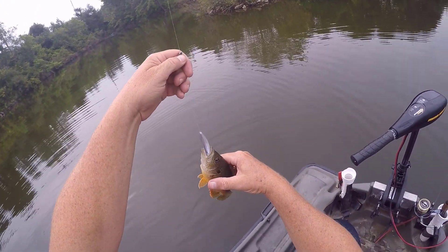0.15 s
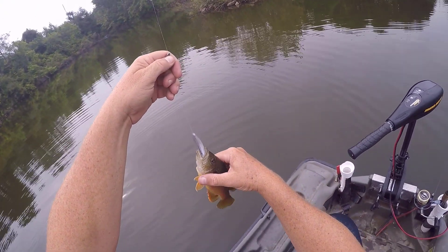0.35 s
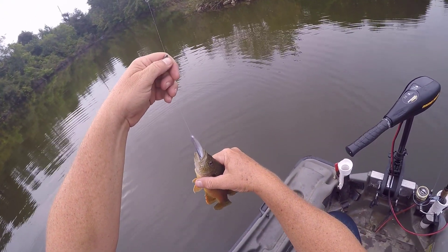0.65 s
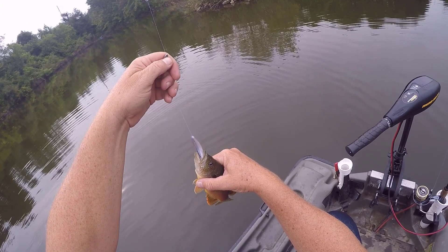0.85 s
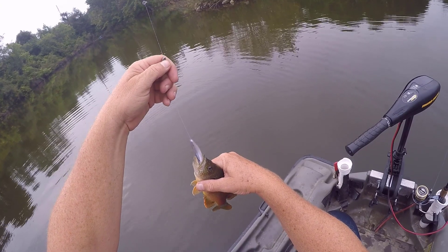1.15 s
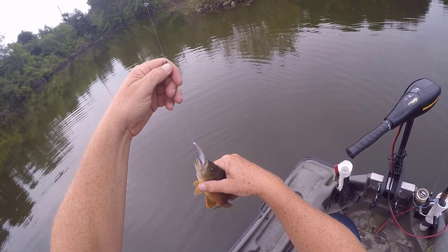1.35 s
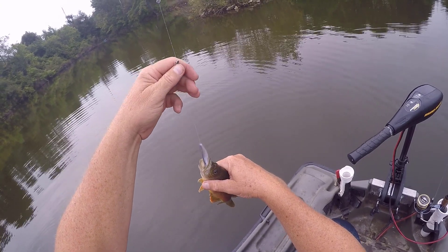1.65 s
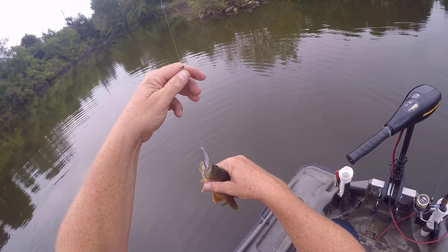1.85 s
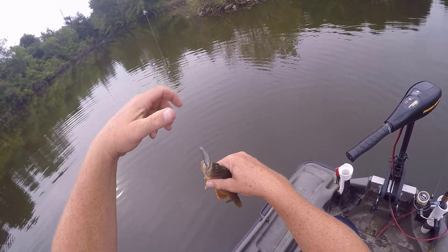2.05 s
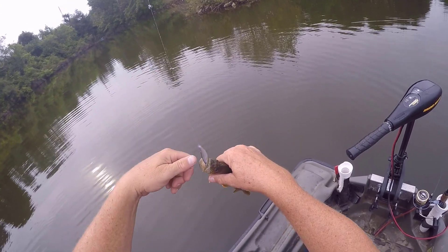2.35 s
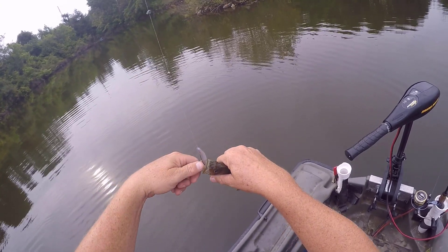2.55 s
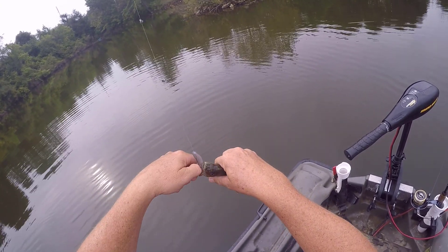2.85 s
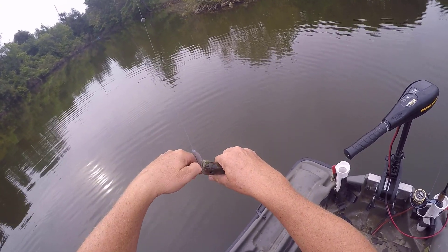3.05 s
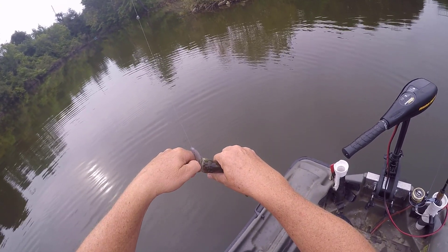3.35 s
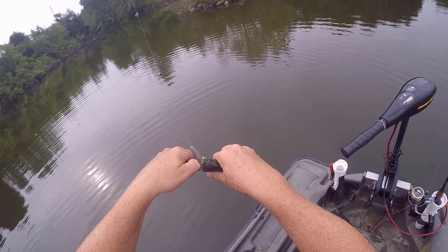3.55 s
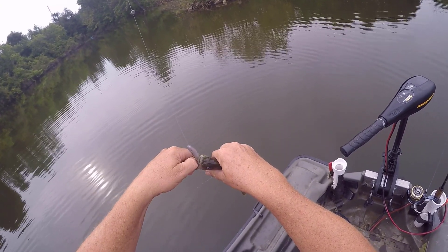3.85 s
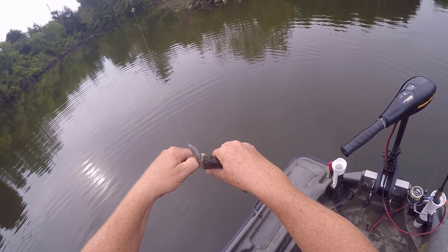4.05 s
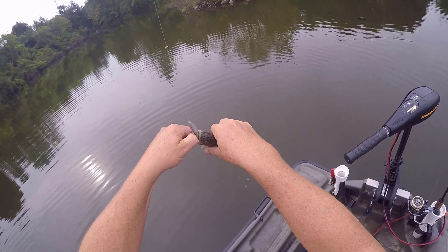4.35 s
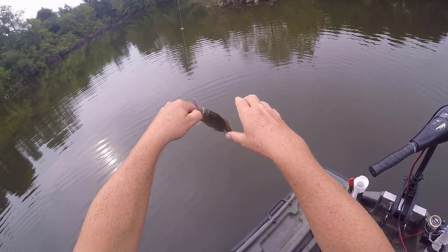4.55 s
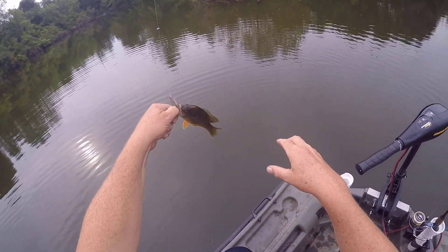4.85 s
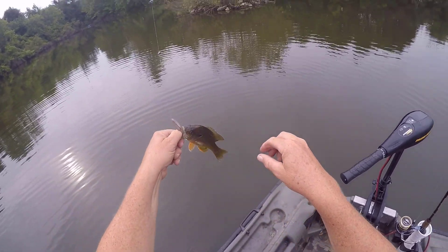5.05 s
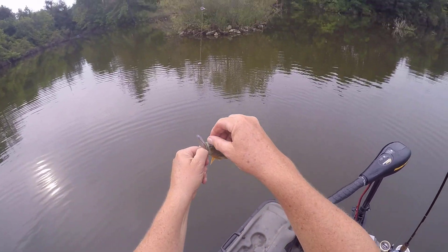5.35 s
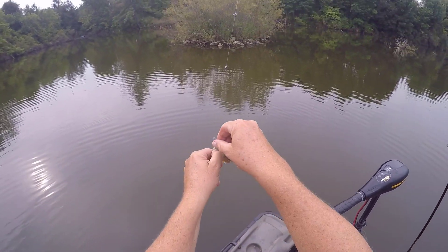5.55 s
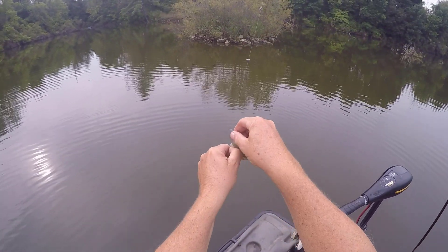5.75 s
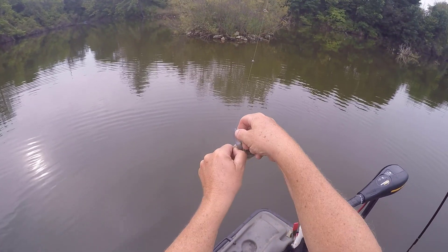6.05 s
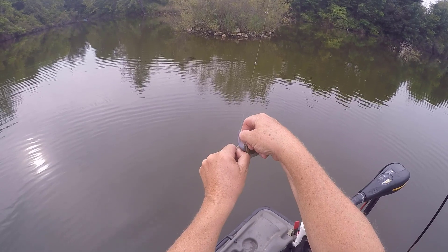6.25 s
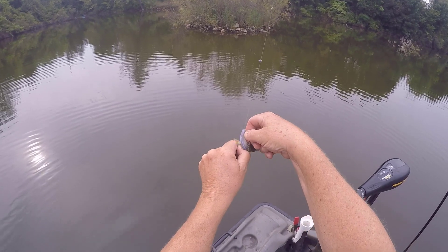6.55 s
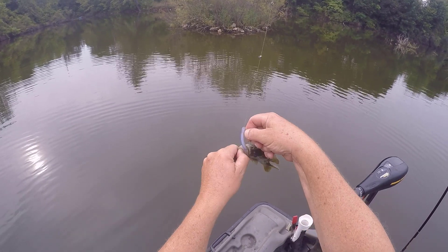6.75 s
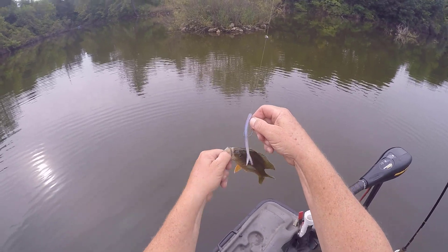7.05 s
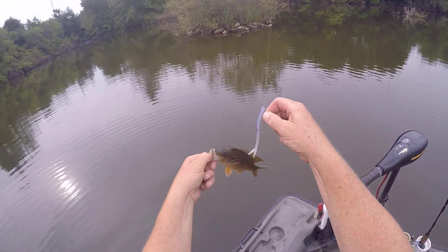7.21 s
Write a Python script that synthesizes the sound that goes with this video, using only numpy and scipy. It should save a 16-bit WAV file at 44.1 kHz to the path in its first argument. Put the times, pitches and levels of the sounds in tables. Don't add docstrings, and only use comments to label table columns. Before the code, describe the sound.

A dense, high cicada chorus, slightly stronger on the right, runs unbroken over a deep rumble of far engines, with soft hiss, faint hum and a thin camera whine. Small ticks open at 0.05 s; thin bird chips sweep up and down around 0.4 and 1.2 s, and a soft rub follows near 0.9 s. Faint taps come at 1.4 and 1.65 s. From 2.2 to 3.2 s a bird whistles a short phrase stepping high to low, twice, echoing lightly off the banks, with dull touches near 2.4 and 2.9 s. Between 4.3 and 5.1 s, wet rubbing and knocks mix with chips and faint slurred whistles. A nearer cicada buzzes very faintly from 5.2 to 7.4 s, in two bouts. More touches come at 5.5 and 5.75 s, then ticks lead to a sharp double snap at 6.43 s. A soft tap, faint distant whistles and tiny ticks finish by 7.4 s.

```python
import sys
import numpy as np
from scipy import signal
from scipy.fft import rfft, irfft, next_fast_len
from scipy.io import wavfile

SR = 44100
rng = np.random.default_rng(int(sys.argv[2]) if len(sys.argv) > 2 else 0)


def boost(x):
    u = np.asarray(x, float) / 20
    return 10 ** u


def pcm_store(signal):
    levels = np.round(np.clip(np.atleast_2d(signal), -1, 1) * 32767)
    wavfile.write(sys.argv[1], SR, levels.astype(np.int16).T)


N = 325458

# t/s, level/dB, left-right difference/dB
CHORUS_SWELL = [
    (0.0, -42, -2.5),
    (4.4, -42.5, -3),
    (5.8, -42, -2),
    (7.38, -42.5, -1.2),
]
# f/Hz, density/(dB per Hz)
TYMBAL_SPECTRUM = [(2470, -25), (4200, -23), (4490, -25), (5270, -2.5), (5820, -6), (6450, 5.5), (6760, 1),
                   (7670, -35), (8790, -27), (9300, -31), (12100, -62), (20500, -120)]
# t/s, duration/s, level/dB
SOLO_BOUTS = [
    (5.2, 1.18, -63),
    (6.47, .95, -64.5),
]
SOLO_EDGE_S = .08
# f/Hz, likeness/(0-1)
LIKENESS = [(30, 0.98), (150, 0.99), (300, 0.83), (600, 0.66), (2500, 0.56), (5000, 0.52), (12000, 0.16)]

# t/s, duration/s, start f/Hz, end f/Hz, level/dB
PHRASE = [(2.175, .13, 3685, 3710, -46.5), (2.29, 0.043, 3120, 2920, -54), (2.3, 0.1, 3660, 3680, -64),
          (2.35, 0.034, 2300, 2340, -60), (2.41, 0.046, 2330, 2315, -49), (2.46, 0.071, 2320, 2276, -57),
          (2.71, .125, 3770, 3600, -48.5), (2.85, .035, 3040, 3060, -57), (2.855, 0.056, 3660, 3730, -52.5),
          (2.9, .03, 2370, 2320, -52), (2.945, 0.067, 2334, 2320, -54), (2.995, 0.08, 2290, 2280, -64),
          (3.13, 0.066, 2310, 2320, -64)]
# t/s, duration/s, start f/Hz, end f/Hz, level/dB
SLURS = [(.085, .08, 3030, 3020, -65), (.69, .095, 745, 733, -60), (1.525, .05, 3050, 3060, -61),
         (1.56, .165, 3040, 3010, -55), (1.71, .21, 2880, 2560, -66), (1.93, .13, 3010, 2700, -66),
         (4.98, .075, 3020, 2980, -59), (5.04, .12, 3070, 2960, -57), (5.14, .08, 2960, 2720, -59),
         (5.74, .27, 2900, 2980, -61), (6.055, .055, 2830, 2680, -60), (6.98, .06, 2990, 3000, -54),
         (7.025, .08, 3050, 3070, -56), (7.09, .11, 3090, 3110, -67), (7.21, .16, 3430, 3440, -64)]
ATTACK_S, RELEASE_S, SAG_DB = .012, .022, 5
# t/s, level/dB, duration/s
FALLING_CHIPS = [(.405, -50, .036), (1.315, -51, .025), (2.172, -46.5, .034), (3.188, -50, 0.05),
                 (4.36, -52, .022), (5.092, -44, 0.047)]
RISING_CHIPS = [(.382, -38, 0.016), (1.177, -45, 0.029), (4.78, -43, .015), (4.897, -38, 0.021)]
FALL_MID_HZ, FALL_HZ_PER_S = 7980, -20000
RISE_MID_HZ, RISE_HZ_PER_S = 7010, 30000
CHIP_LEAN_DB = 4
ECHO_T60_S, WHISTLE_ECHO_DB, CHIP_ECHO_DB, HAND_ECHO_DB = .35, -10, -9, -20

# t/s, peak level/dB, ring f/Hz, ring T60/s, crack level/dB
TOUCHES = [(1.366, -48, 641, 0.017, -6), (1.653, -46, 797, 0.018, 8), (2.359, -39.5, 416, 0.018, 0),
           (2.398, -40, 400, 0.061, 1), (2.867, -38, 1160, 0.025, -10), (4.385, -42.5, 495, 0.025, 11),
           (4.427, -39, 930, 0.023, -1), (4.586, -40.5, 2060, 0.011, 0), (4.732, -43, 618, 0.12, 1),
           (5.499, -42, 1090, 0.025, -8), (5.754, -42.5, 855, 0.029, 0), (6.848, -42, 668, 0.034, -13)]
# t/s, peak level/dB, ring f/Hz
TICKS = [(.0372, -34, 2400), (.062, -41, 1300), (5.826, -46, 2000), (6.1135, -39, 4100),
         (6.3928, -38, 3300), (6.4045, -38, 3100), (6.41, -37, 3200), (7.2145, -45, 3430),
         (7.2564, -43, 3420)]
TICK_CYCLES, TICK_CRACK_DB, CRACK_T60_S = 22.0, -3, .005
# t/s, peak level/dB, ring f/Hz, ring T60/s, crack level/dB
SNAP = [
    (6.4192, -29, 1990, .018, 3),
    (6.4194, -31, 6500, .003, 3),
    (6.4391, -25, 3350, .005, 0),
    (6.4392, -32, 11800, .005, 2),
    (6.4396, -30, 1850, .008, 0),
    (6.4398, -32, 750, .012, -6),
]
# t/s, duration/s, level/dB
RUBS = [(0.023, 0.039, -69), (0.9, 0.38, -58.5), (2.345, .09, -55), (4.288, 0.23, -53), (4.477, 0.11, -59),
        (4.67, 0.18, -55.5), (5.005, 0.053, -50), (5.493, .12, -55.5), (5.75, 0.076, -53)]
# f/Hz, density/(dB per Hz)
RUB_SPECTRUM = [(150, -12), (250, 8), (377, -1), (612, 0), (761, -2), (946, -2), (4500, -23), (5850, -50),
                (9900, -120)]
RUB_EDGE_S = .03

FRAME_HZ, WHINE_HZ = 59.94, 4784
# multiple of frame rate, level/dB rms
HUM = [(4, -62.5), (6, -67), (10, -80), (12, -74.5), (14, -73),
       (163, -85), (171, -84), (179, -88), (180, -84), (195, -87), (228, -80), (244, -83)]
# multiple of the whine pitch, bandwidth/Hz, level/dB rms
WHINE_BANDS = [(1, 98, -66.5), (2, 76, -70.5), (3, 200, -67.5)]

# t/s, level/dB
RUMBLE_SWELL = [(0.0, -30), (0.35, -32.5), (2.6, -33), (3.3, -32), (4.0, -33), (5.9, -31.5), (7.38, -33)]
# f/Hz, density/(dB per Hz)
RUMBLE_SPECTRUM = [(7.1, -45), (12, -7.5), (43, 2), (65, -1), (117, -7), (151, -12), (173, -16.5),
                   (228, -24), (270, -25.5), (354, -29.5), (498, -36.5), (700, -35), (910, -45.5),
                   (1540, -120)]
# f/Hz, bandwidth/Hz, level/dB rms
ENGINE_HUMPS = [(56.5, 8.6, -42.5), (86.6, 3.4, -53), (108.24, 4.7, -49), (145.96, 3.7, -53),
                (214.1, 8.6, -58)]
# f/Hz, density/(dB per Hz)
AIR_SPECTRUM = [(240, -52), (400, -58), (550, -28), (827, -13), (1240, -13.5), (1470, -14.5), (3820, -18),
                (4510, -16.5), (5240, -7.5), (6480, 3), (8770, -18), (14900, -19.5)]
AIR_DB = -44
LEAN_DB = -1.6
TOP_HZ = 15170


def cicadas(near_db, count=40):
    crowd = rng.standard_normal((2, N))
    for k, rate in enumerate(rng.uniform(95, 200, count)):
        polarity = (-1) ** (k // 2)
        insect_gain = boost(near_db + rng.normal(0, 4.1))
        crowd[k % 2] += insect_gain * polarity * click_train(rate, jitter=.08)
    level_db, lean_db = in_time(CHORUS_SWELL)
    return colour(crowd, TYMBAL_SPECTRUM) * pan(boost(level_db), lean_db)


def click_train(per_s, jitter):
    intervals = SR / per_s * (1 + jitter * rng.standard_normal(3000))
    at = np.cumsum(intervals)
    clicks = np.full(N, 1e-18)
    clicks[at[(at > 0) & (at < N)].astype(int)] = 1
    return clicks


def soloist():
    phase = np.pi * 81 * np.arange(N) / SR
    strokes = np.sin(phase) ** 4 * (1 + 0.43 * np.sin(phase))
    buzz = strokes * rng.standard_normal(N)
    tone = resonance(buzz, 8000, width_hz=90) + 0.33 * resonance(buzz, 7600, width_hz=160)
    level = sum(boost(db) * bout(s, length, SOLO_EDGE_S, SOLO_EDGE_S) for s, length, db in SOLO_BOUTS)
    return level * rms_one(tone)


def whistles(notes, waver, flutter_db):
    song = np.zeros(N)
    bend = 1 + waver * flutter(55)
    for s, length, start_hz, end_hz, db in notes:
        at = slice(int(s * SR), int((s + length) * SR))
        way = np.linspace(0, 1, at.stop - at.start)
        hz = (start_hz + (end_hz - start_hz) * way) * bend[at]
        tone = np.sin(2 * np.pi * np.cumsum(hz) / SR)
        envelope = boost(db - SAG_DB * way) * bout(s, length, ATTACK_S, RELEASE_S)[at]
        song[at] += np.sqrt(2) * envelope * tone
    return song * boost(flutter_db * flutter(50))


def chips(rows, mid_hz, hz_per_s):
    out = np.zeros(N)
    for s, db, length in rows:
        way = np.linspace(0, 1, int(length * SR))
        hz = mid_hz + hz_per_s * length * (way - .5)
        tone = np.sin(2 * np.pi * np.cumsum(hz) / SR)
        out[int(s * SR):][:len(way)] += np.sqrt(2) * boost(db) * np.sin(np.pi * way) * tone
    return pan(out, CHIP_LEAN_DB)


def banks(x, echo_db):
    t = np.arange(int(.3 * SR)) / SR
    cloud = rng.standard_normal((2, len(t))) * boost(-60 * t / ECHO_T60_S) * (t > .008)
    cloud *= boost(echo_db) / np.sqrt(np.sum(cloud ** 2, axis=1, keepdims=True))
    return x + signal.fftconvolve(x * np.ones((2, 1)), cloud, axes=1)[:, :N]


def handling():
    out = np.zeros(N)
    t = np.arange(int(.06 * SR)) / SR
    ticks = [(s, db, hz, TICK_CYCLES / hz, TICK_CRACK_DB) for s, db, hz in TICKS]
    for s, db, hz, t60, crack_db in TOUCHES + ticks + SNAP:
        ring = np.sin(2 * np.pi * hz * t) * boost(-60 * t / max(t60, .002))
        crack = rng.standard_normal(len(t)) * boost(crack_db - 60 * t / CRACK_T60_S)
        band = signal.butter(2, [300, min(3.8 * hz, 15500)], "band", fs=SR, output="sos")
        crack = signal.sosfilt(band, crack)
        out[int((s + .0005) * SR):][:len(t)] += boost(db) * (ring + crack * np.sqrt(4000 / hz))
    return out


def rubbing():
    grains = rng.standard_normal((2, N)) * boost(2.3 * flutter(55))
    level = sum(boost(db) * bout(s, length, RUB_EDGE_S, RUB_EDGE_S) for s, length, db in RUBS)
    return level * colour(grains, RUB_SPECTRUM)


def camera():
    turn = 2 * np.pi * FRAME_HZ * np.arange(N) / SR
    out = sum(np.sqrt(2) * boost(db) * np.sin(k * turn + rng.uniform(0, 7.37)) for k, db in HUM)
    gate = 1 + 0.1 * np.cos(turn) + 0.43 * np.cos(3 * turn)
    for k, width_hz, db in WHINE_BANDS:
        out = out + boost(db) * gate * narrow_noise(k * WHINE_HZ, width_hz)
    return out


def rumble():
    swell = boost(in_time(RUMBLE_SWELL)[0] - 2.0)
    return swell * colour(rng.standard_normal((2, N)), RUMBLE_SPECTRUM) + engines()


def engines():
    return sum(boost(db) * narrow_noise(hz, width_hz) for hz, width_hz, db in ENGINE_HUMPS)


def air():
    return boost(AIR_DB) * colour(rng.standard_normal((2, N)), AIR_SPECTRUM)


def narrow_noise(hz, width_hz):
    once = resonance(rng.standard_normal(N), hz, width_hz)
    return rms_one(resonance(once, hz, width_hz))


def resonance(x, hz, width_hz):
    r = np.exp(-np.pi * width_hz / SR)
    zeros = np.array([1, 0, -1]) * (1 - r * r) / 2
    poles = [1, -2 * r * np.cos(2 * np.pi * hz / SR), r * r]
    return signal.lfilter(zeros, poles, x)


def colour(pair, spectrum):
    size = next_fast_len(N)
    hz = np.arange(1, size // 2 + 2) * SR / size
    mid, side = rfft(pair, size)
    alike = np.clip(at_hz(LIKENESS, hz), 0, 1)
    both = np.sqrt(1 + alike) * mid + np.sqrt(1 - alike) * side * [[1], [-1]]
    return rms_one(irfft(both * boost(at_hz(spectrum, hz)), size)[:, :N])


def at_hz(points, hz):
    table_hz, values = np.array(points).T
    return np.interp(np.log(hz), np.log(table_hz), values)


def in_time(rows):
    s, *columns = np.transpose(rows)
    return [np.interp(np.arange(N) / SR, s, c) for c in columns]


def flutter(per_s):
    steps = rng.standard_normal(int(N / SR * 60) + 2)
    return np.interp(np.arange(N) / SR * min(per_s, 59), np.arange(len(steps)), steps)


def bout(s, length, rise_s, fall_s):
    t = np.arange(N) / SR - s
    return np.clip(np.minimum(t / rise_s, (length - t) / fall_s), 0, 1)


def pan(x, lean_db):
    return np.array([x * boost(lean_db / 2), x * boost(-lean_db / 2)])


def rms_one(x):
    return x / np.sqrt(np.mean(x ** 2) + 1e-20)


def scene():
    song = whistles(PHRASE, waver=.004, flutter_db=1.5) + whistles(SLURS, waver=.009, flutter_db=3.0)
    thin = chips(FALLING_CHIPS, FALL_MID_HZ, FALL_HZ_PER_S) + chips(RISING_CHIPS, RISE_MID_HZ, RISE_HZ_PER_S)
    birds = banks(pan(song, 0.54), WHISTLE_ECHO_DB) + banks(thin, CHIP_ECHO_DB)
    hands = banks(handling(), HAND_ECHO_DB) + rubbing()
    rest = soloist() + birds + hands + camera() + rumble() + air()
    return cicadas(near_db=5.5) + rest * pan(np.ones(1), LEAN_DB)


def band_limit(x):
    return signal.sosfilt(signal.butter(12, 15730, fs=SR, output="sos"), x)


def record(dry):
    low_pass = signal.ellip(12, .3, 40, TOP_HZ, fs=SR, output="sos")
    mix = signal.sosfilt(low_pass, dry)
    return band_limit(mix)


dry = scene()
out = record(dry)
pcm_store(out)
```